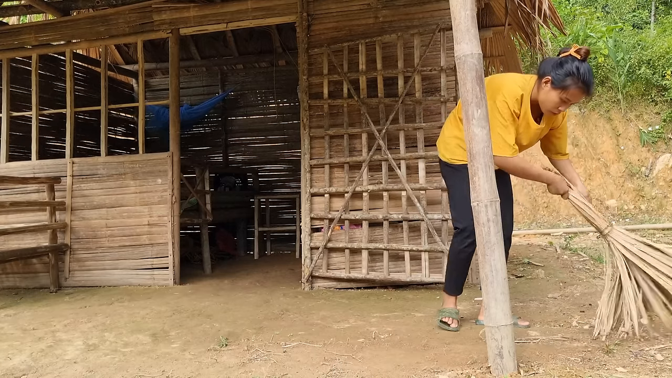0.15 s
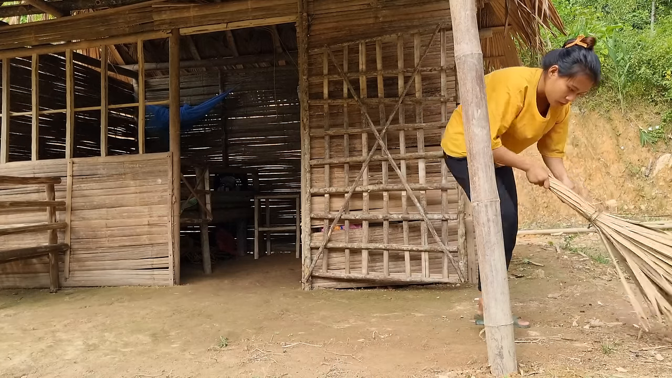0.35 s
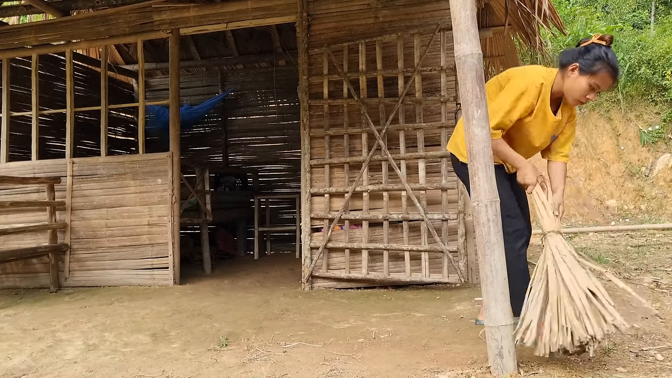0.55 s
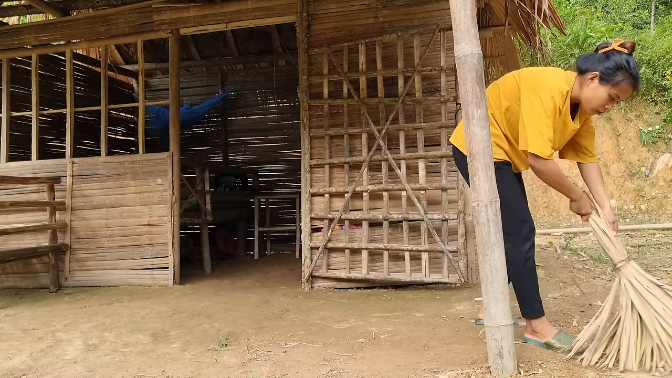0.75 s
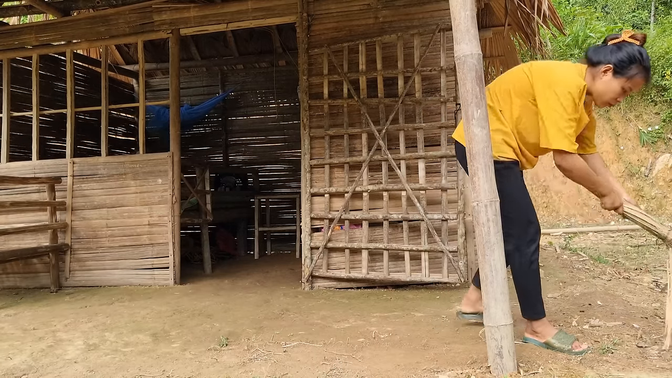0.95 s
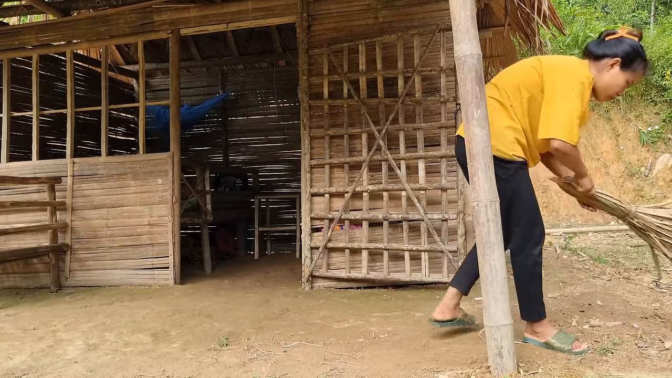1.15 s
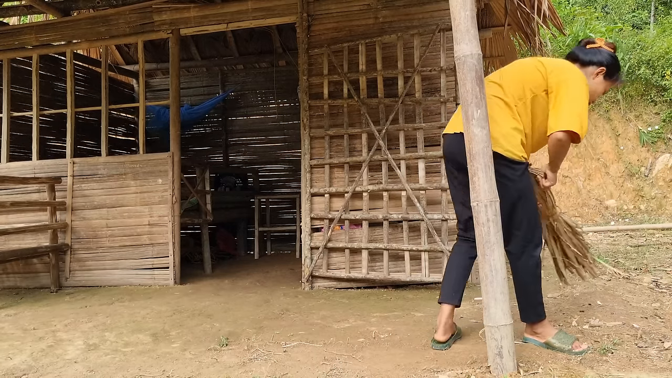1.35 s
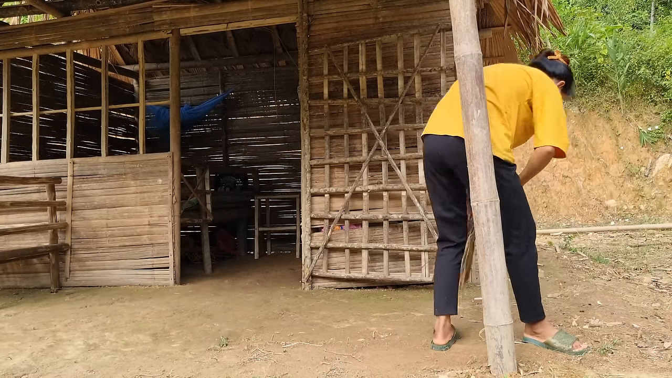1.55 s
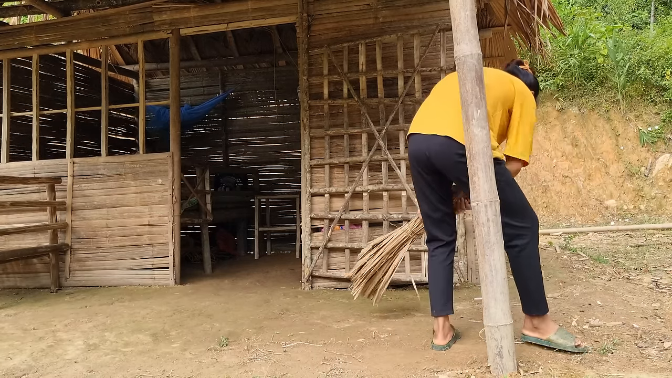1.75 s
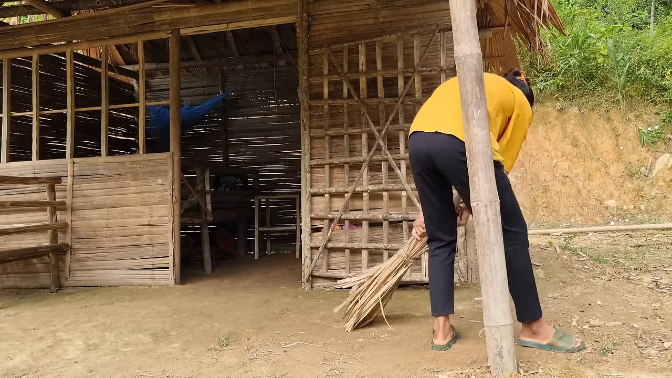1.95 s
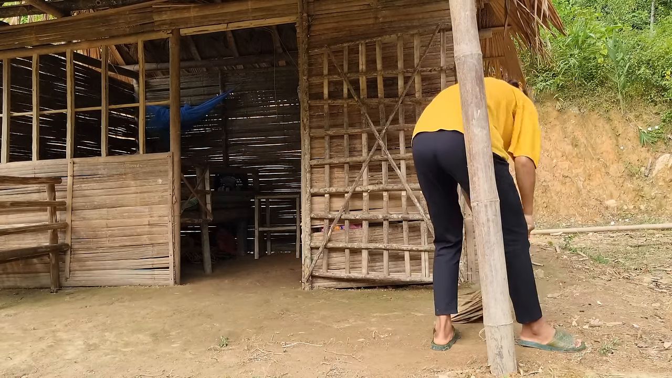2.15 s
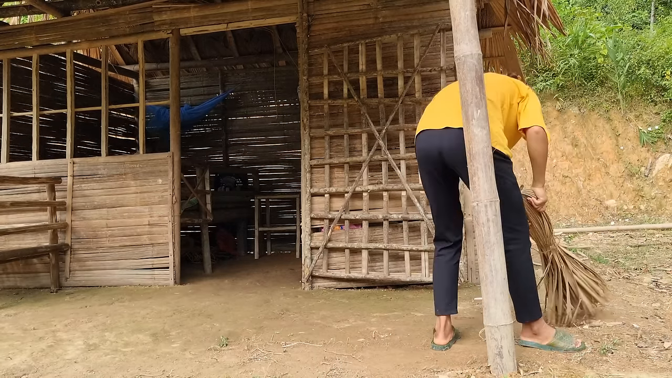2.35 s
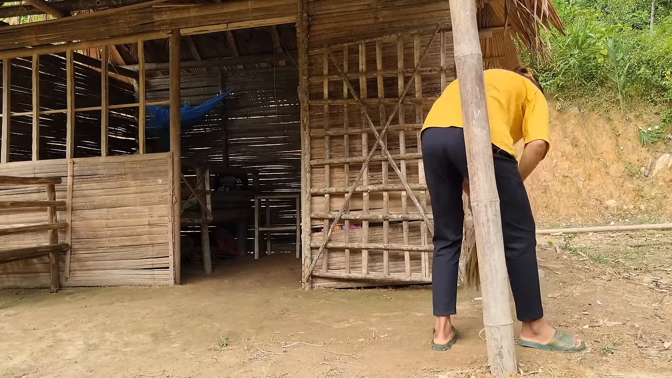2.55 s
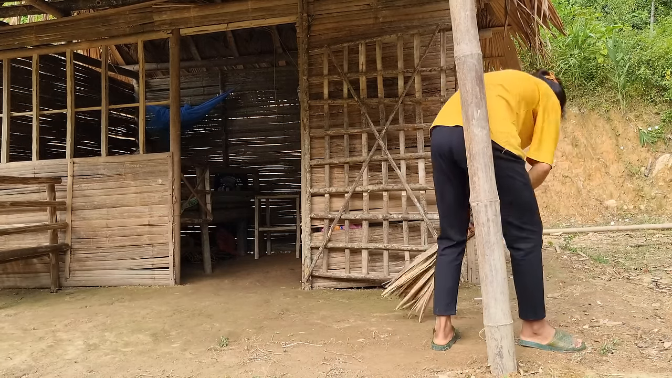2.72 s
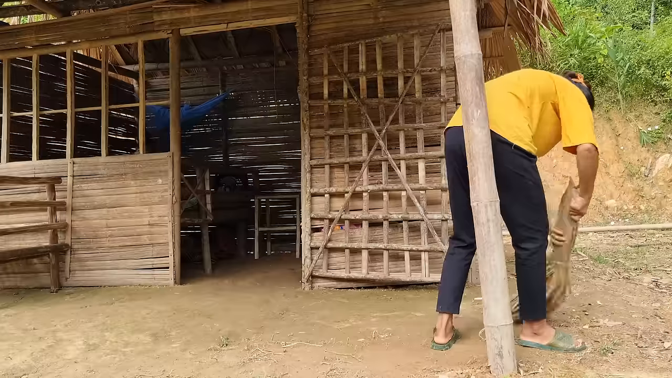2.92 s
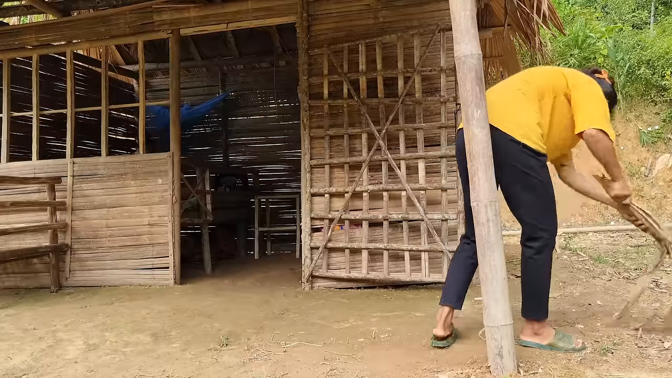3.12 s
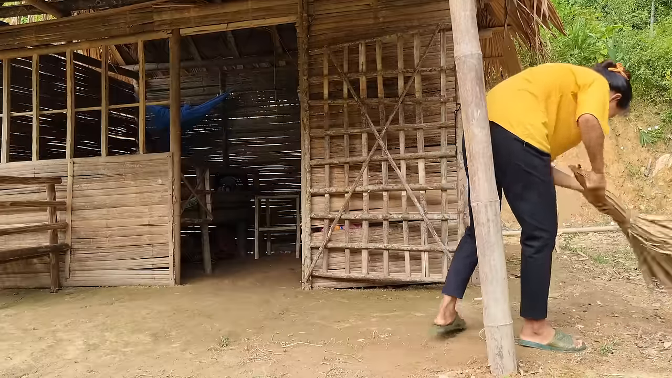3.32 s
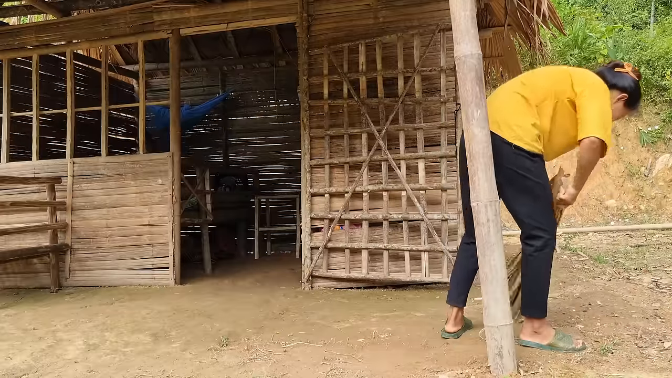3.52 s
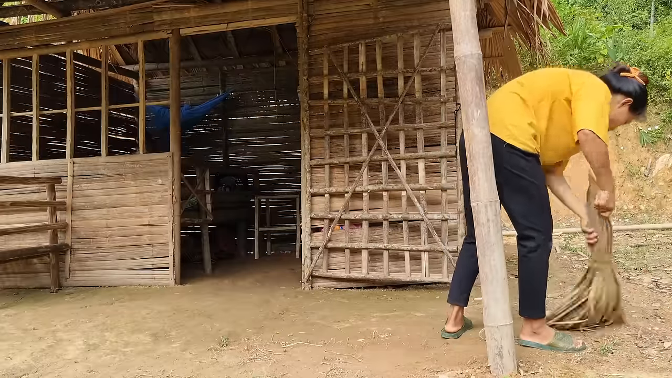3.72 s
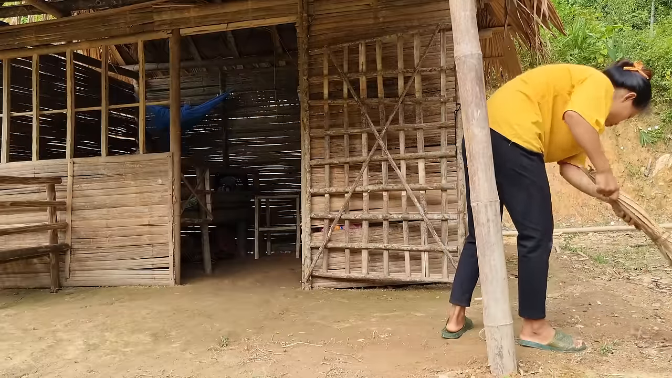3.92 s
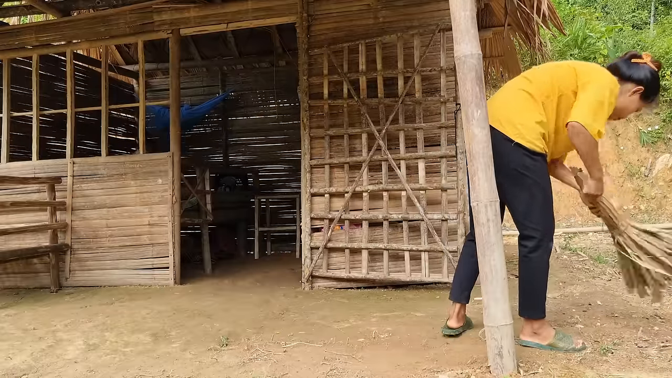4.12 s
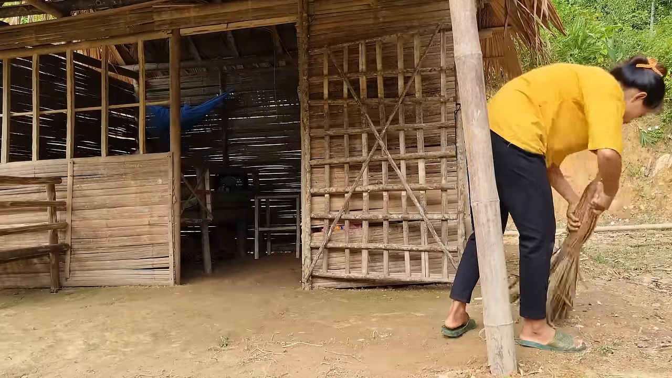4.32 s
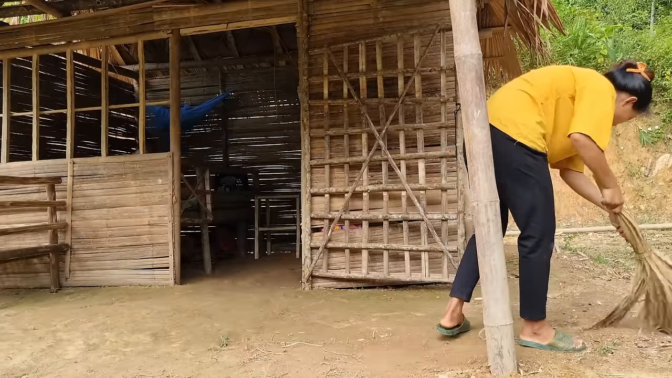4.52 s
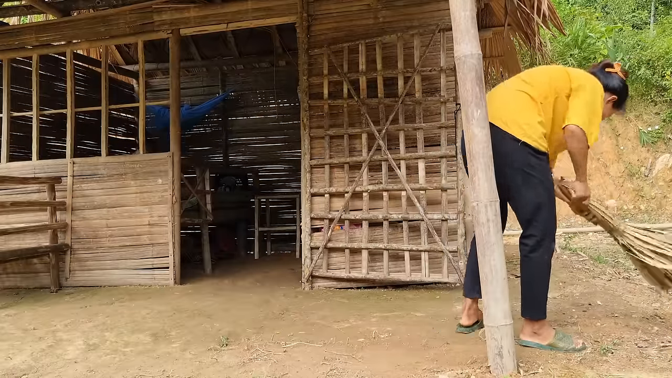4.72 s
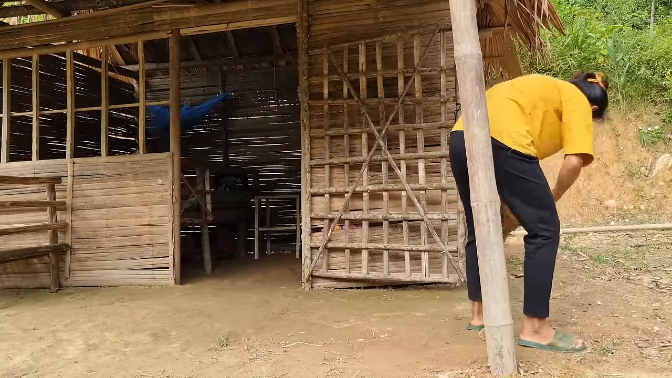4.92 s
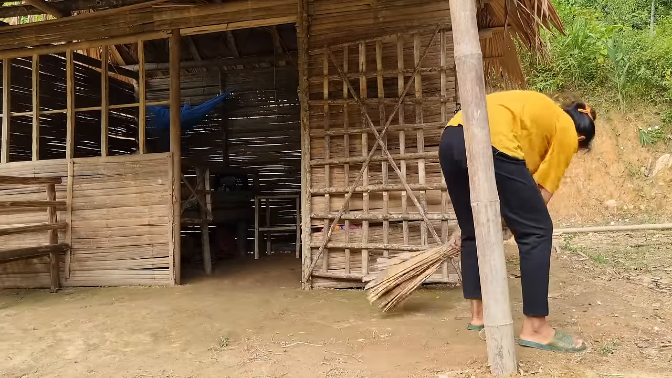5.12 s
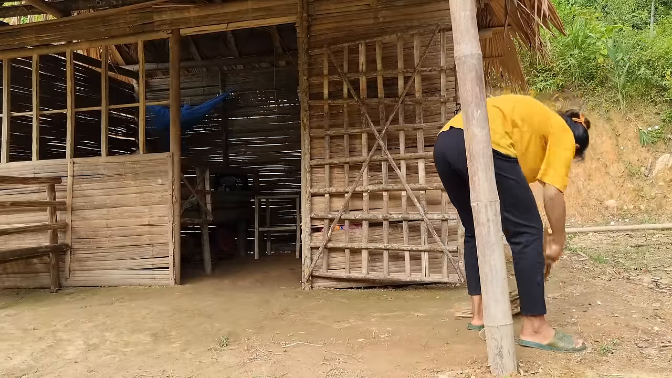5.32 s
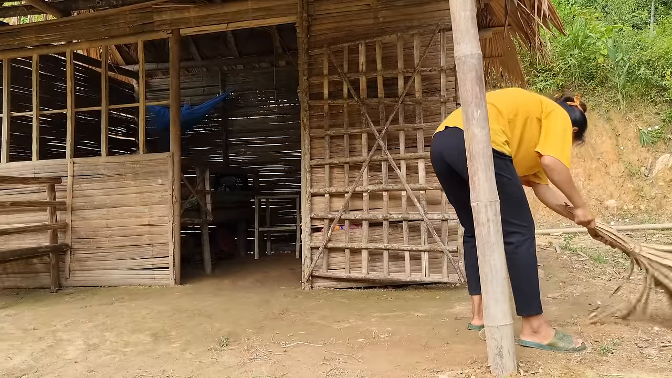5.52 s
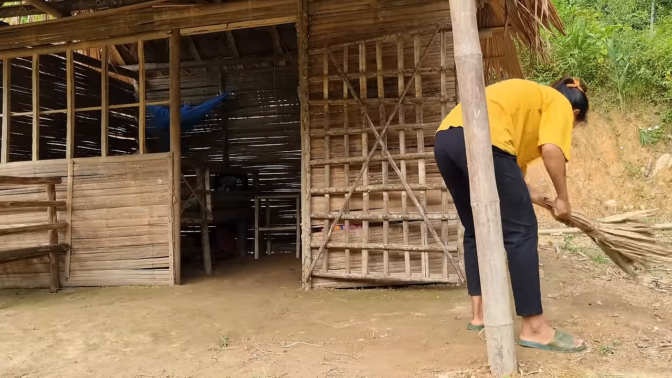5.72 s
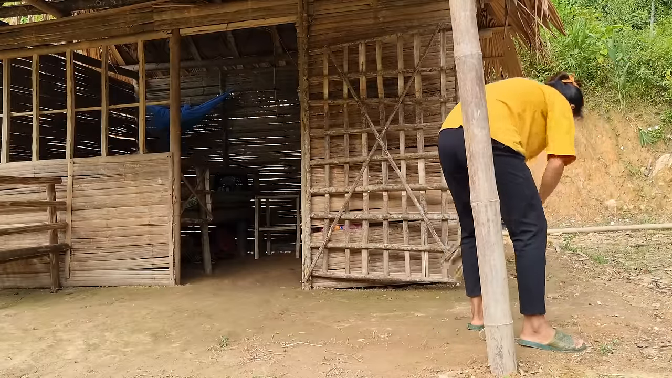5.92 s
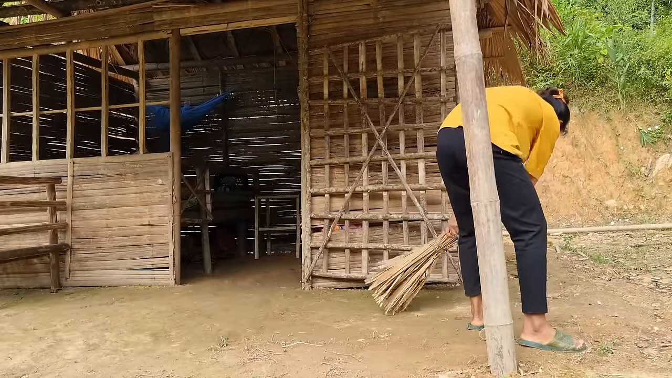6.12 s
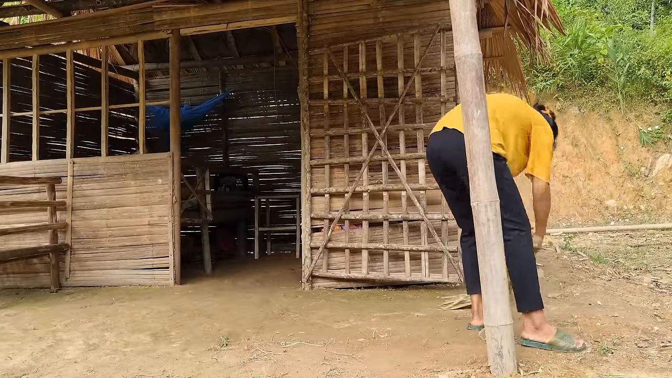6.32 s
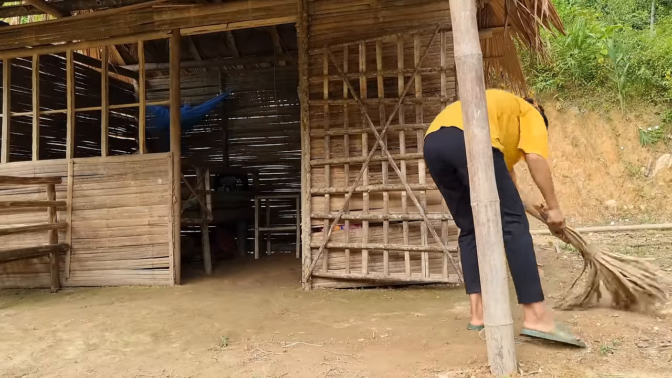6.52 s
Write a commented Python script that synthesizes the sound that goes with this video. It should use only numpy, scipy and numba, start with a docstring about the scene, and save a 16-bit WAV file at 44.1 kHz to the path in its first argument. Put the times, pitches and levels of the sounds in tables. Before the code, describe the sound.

A large straw broom sweeps bare packed dirt just right of a close stereo microphone. Eight crisp, rasping strokes swell and fade, the first two close together, then a longer pause before a steadier rhythm. Straws snap, tufts scuff and fine grit ticks after each lift, with soft ground thuds. Wooden walls return a very short echo; faint yard murmur and thin insect buzz continue beneath.

```python
"""A faint yard murmur with two bands of insects, and at once a straw broom sweeping packed dirt.
The broom is to the right of a camera with two microphone ports: slips and twangs of straw tufts, split in bands.
Straws snap, tufts scuff, the ground thuds, and flung grit ticks after each lift: noise sprays and damped sines.
Walls scatter a short echo; murmur and insects are filtered noise that runs on through the pauses."""
import sys
import numpy as np
from scipy import signal
from scipy.fft import rfft, irfft, next_fast_len
from scipy.io import wavfile
from scipy.ndimage import uniform_filter1d, map_coordinates
from numba import njit

SR = 44100
rng = np.random.default_rng(int(sys.argv[2]) if len(sys.argv) > 2 else 0)


def master(y):
    """Save y as 16-bit WAV."""
    cut = np.clip(np.atleast_2d(y).T, -1, 1)
    pcm = np.round(cut * 32767)  # scale
    wavfile.write(sys.argv[1], SR, pcm.astype(np.int16))


N = 293706  # samples


def undb(db):
    """Amplitude factor of a dB value."""
    return 10 ** (np.asarray(db) / 20)


def level(x, rms_db):
    """Scale to an RMS level, taken over all channels together."""
    return x * undb(rms_db) / np.sqrt(np.mean(x ** 2))


def decay(t_s, t60_s):
    """Exponential decay, 60 dB down after t60_s."""
    return np.exp(-np.log(1000) * t_s / t60_s)


def band(x, lo_hz, hi_hz):
    """Butterworth band-pass."""
    sos = signal.butter(2, [lo_hz, min(hi_hz, .45 * SR)], "band", fs=SR, output="sos")
    return signal.sosfilt(sos, x)


def below(x, edge_hz):
    """Gentle low-pass without phase shift, so that x - below(x) is its exact complement."""
    size = next_fast_len(N)
    hz = np.arange(size // 2 + 1) * SR / size
    return irfft(rfft(x, size) / (1 + (hz / edge_hz) ** 4), size)[..., :N]


def colour(x, table, column):
    """Filter whose gain follows one dB column of a table, interpolated over log frequency."""
    size = next_fast_len(N)
    hz = np.maximum(np.arange(size // 2 + 1) * SR / size, 1)
    rows = np.array(table)
    gain_db = np.interp(np.log(hz), np.log(rows[:, 0]), rows[:, column])
    return irfft(rfft(x, size) * undb(gain_db), size)[:N]


def walk(rate_hz):
    """Random levels held 1 / rate_hz seconds and slewed twice."""
    hold = int(SR / rate_hz)
    steps = np.repeat(rng.standard_normal(N // hold + 1), hold)
    return 1.03 * uniform_filter1d(uniform_filter1d(steps, hold), hold)[:N]


# yard murmur spectrum: freq_hz, left_db, right_db (relative)
YARD_SPECTRUM = [(30, -4, -18), (97, -12, -14), (242, -5, -12.5), (350, 5.5, -0.5), (453, -1, -7.5),
                 (1050, 3, -7), (1400, -11.5, -16), (2660, -4.5, -14.5), (3900, -20, -21), (6440, -35, -24),
                 (7200, -50, -55), (9300, -39, -25), (15500, -21, -50)]
# insect bands: low_hz, high_hz
INSECT_BANDS_HZ = [(4500, 5500), (6400, 7300)]
# insect levels, one row a band: left_db, right_db
INSECT_LEVELS_DB = [(-70, -69), (-78, -72)]
YARD_DB, YARD_OPPOSED = -60.5, 0.98  # RMS before wavering; share of opposed middle range


def yard():
    """Murmur with its middle range in opposite phase at the ports and a wavering low end; insects buzz above."""
    common = band(rng.standard_normal(N), 287, 2500)
    own = rng.standard_normal((2, N))
    opposed = np.array([common, -common])
    noise = own + YARD_OPPOSED * (opposed - band(own, 270, 1880))
    murmur = np.array([colour(noise[k], YARD_SPECTRUM, k + 1) for k in range(2)])
    murmur = level(murmur, YARD_DB)
    low = below(murmur, 410)
    out = low * undb(1.5 * walk(12)) + (murmur - low) * undb(.8 * walk(3))
    for (lo_hz, hi_hz), port_db in zip(INSECT_BANDS_HZ, INSECT_LEVELS_DB):
        buzz = band(rng.standard_normal((2, N)), lo_hz, hi_hz) * undb(2.6 * walk(72))
        out = out + level(buzz, 0) * undb(port_db)[:, None]
    return out


# strokes, the head travelling rightwards: start_s, end_s, left_lag_start_ms, left_lag_end_ms,
# drag_db, hiss_db, grit_db (base levels re scrape: dull drag, straw hiss, fine grit)
STROKES = [(0.033, 0.442, .19, 0.28, -9.5, -0.27, 2), (0.717, 1.107, 0.21, .29, -13, -1.2, -1),
           (2.14, 2.42, 0.037, .22, -14, -0.52, 1), (2.936, 3.296, 0.11, 0.3, -14, -0.79, 1.5),
           (3.716, 4.106, .18, 0.27, -12.5, -0.52, 1.5), (4.473, 4.766, .2, 0.27, -14, 0.56, 3),
           (5.373, 5.632, 0.088, 0.27, -13, 0.35, 1), (6.39, 6.58, 0.085, .23, -14.5, -1, 1.5)]
RETURN_S = .12  # head is back in place this long before it travels


def swing():
    """Left-port lag and colours over time: moved along each stroke, held after the lift, carried back."""
    start_s, end_s, first_ms, last_ms, *colours_db = np.transpose(STROKES)
    t = np.arange(N) / SR

    def path(*corners):
        return np.ravel(corners, order="F")[1:]

    knots_s = path(start_s - 2 * RETURN_S, start_s - RETURN_S, start_s, end_s)
    lag_ms = np.interp(t, knots_s, path(np.roll(last_ms, 1), first_ms, first_ms, last_ms))
    colours_db = [np.interp(t, knots_s, path(np.roll(c, 1), c, c, c)) for c in colours_db]
    return lag_ms, *colours_db


def ports(x, lag_ms):
    """The right port is nearer: the left one hears the same sound a little later."""
    return np.array([map_coordinates(x, [np.arange(N) - lag_ms * SR / 1000], order=3), x])


@njit
def ring(starts, hz, cycles, size, n):
    """Each grain is a damped sine that falls to 1/e in the given number of cycles."""
    out = np.zeros(n + 4096)
    for k in range(len(starts)):
        turn = np.exp(complex(-hz[k] / cycles[k], 2 * np.pi * hz[k]) / SR)
        z = size[k] + 0j
        for i in range(min(4096, int(5 * cycles[k] / hz[k] * SR))):
            out[starts[k] + i] += z.imag
            z *= turn
    return out[:n]


def tuft(slips_per_s, scatter_db, judder_db, twangs_per_s, twang_db, cycles):
    """One tuft of straw: dense slips of uneven size in surges; single straws twang at their own pitch."""
    hits = rng.random(N) < slips_per_s / SR
    slips = hits * rng.standard_normal(N) * undb(scatter_db * rng.exponential(size=N))
    chance = rng.random((N // 20, 4))
    when, pitch, damp, size = chance[:int(min(twangs_per_s * N / SR, N // 20))].T
    hz = 500 * 24 ** pitch
    # higher straws start stronger, so the twangs spread evenly over the spectrum
    sizes = undb(twang_db - 25.0 * size) * hz / 2000
    twangs = ring((when * N).astype(np.int64), hz, cycles * (.5 + damp), sizes, N)
    return (slips + twangs) * undb(judder_db * walk(70))


# scrape, one curve a stroke, touch to rustle after the lift: time_s, level_db
SCRAPE_CURVES = [
    [(0., -63), (.02, -55), (.05, -42.5), (.17, -37.5), (.3, -40), (.345, -45.5), (.42, -49.5),
     (.445, -53.5), (.57, -66)],
    [(.66, -58.5), (.745, -48.5), (.775, -37.5), (.95, -38.5), (1.02, -39.5), (1.11, -43.5), (1.145, -55.5),
     (1.26, -60), (1.47, -76.5)],
    [(1.84, -83), (2.02, -68), (2.05, -57.5), (2.12, -46.5), (2.22, -40), (2.35, -45.5), (2.43, -43.5),
     (2.52, -52.5), (2.62, -60), (2.72, -64)],
    [(2.8, -63), (2.88, -59.5), (2.925, -46), (3.06, -42), (3.085, -37.5), (3.2, -39.5), (3.3, -47),
     (3.33, -51), (3.41, -58), (3.6, -64.5)],
    [(3.65, -54.5), (3.72, -48), (3.77, -45), (3.8, -40.5), (3.86, -35), (4., -38.5), (4.11, -43.5),
     (4.15, -56), (4.22, -60), (4.28, -63.5), (4.4, -68)],
    [(4.47, -45), (4.55, -40.5), (4.64, -38.5), (4.69, -43.5), (4.74, -47.5), (4.8, -50.5), (4.85, -59.5),
     (4.95, -65.5), (5.12, -75.5)],
    [(5.25, -67), (5.29, -54.5), (5.34, -43), (5.43, -40.5), (5.56, -37), (5.65, -41), (5.75, -51.5),
     (5.83, -53), (5.95, -65)],
    [(6.21, -71.5), (6.3, -54), (6.38, -42.5), (6.48, -40), (6.54, -39), (6.66, -39.5)],
]
# broom colour at each port: freq_hz, left_db, right_db (relative)
PORT_COLOURS = [(35, -32.6, -33.1), (100, -19.2, -21.9), (300, -12.3, -14.1), (600, -11.5, -9.4),
                (900, -6.5, -2.5), (1300, -2.0, 0.0), (2000, -2.7, -2.2), (2600, -4.4, -5.8),
                (3200, -4.6, -6.9), (4200, -9.8, -5.2), (6000, -15.7, -9.9), (7800, -28.3, -17.2),
                (10000, -23.2, -13.5), (15300, -17.4, -10.6)]
# edges between drag, scrape, hiss and grit: edge_hz
SPLIT_HZ = (616, 2123, 6240)
TUFT_SPREAD_MS = 0.045
UNSHARED_DB = -5  # gain of the slips drawn apart for each port
FLICKER_DB = 0.44
SIDE_LAG_MS, FULL_DB = .25, -40  # lag and scrape level at which the stroke colours hold
# further right the sweeper hides less of the broom
DRAG_DB_PER_MS, HISS_DB_PER_MS, GRIT_DB_PER_MS = 13., 2.5, 42
# dB per dB of scrape level
DRAG_PER_DB, HISS_PER_DB, GRIT_PER_DB = -0.11, -0.12, 0.07


def broom(lag_ms, drag_db, hiss_db, grit_db, count=5):
    """Tufts lie side by side, each with its own lag; their rub splits into drag, scrape, hiss and grit."""
    scrape_db = np.interp(np.arange(N) / SR, *np.concatenate(SCRAPE_CURVES).T)
    right_ms = lag_ms - SIDE_LAG_MS
    touch_db = np.maximum(scrape_db - FULL_DB, -22)
    drag_db = drag_db + DRAG_DB_PER_MS * right_ms + DRAG_PER_DB * touch_db
    hiss_db = hiss_db + HISS_DB_PER_MS * right_ms + HISS_PER_DB * touch_db + FLICKER_DB * walk(23)
    grit_db = grit_db + GRIT_DB_PER_MS * right_ms + GRIT_PER_DB * touch_db + FLICKER_DB * walk(22)

    places = np.linspace(-1, 1, count)
    rub = sum(ports(tuft(7000, 0.84, 4.0, 350, -8.0, 6.5), lag_ms + TUFT_SPREAD_MS * p) for p in places)
    apart = np.array([tuft(7000, 2.3, 1.74, 350, -4.0, 13.0) for _ in range(2)])
    rub = rub + undb(UNSHARED_DB) * (apart - below(apart, 210))
    rub = rub * undb(1.0 * walk(30))
    rub = np.array([colour(rub[k], PORT_COLOURS, k + 1) for k in range(2)])

    low, mid, top = (below(rub, hz) for hz in SPLIT_HZ)
    drag = level(low, 0) * undb(drag_db + 1.5 * walk(25))
    scrape = level(mid - low, 0) * undb(FLICKER_DB * walk(27))
    hiss = level(top - mid, 0) * undb(hiss_db)
    grit = level(rub - top, 0) * undb(grit_db)
    return (drag + scrape + hiss + grit) * undb(scrape_db)


BURST_PAN_DB = -3.5  # left re right


def bursts(table, lag_ms, rise_s, spread, crack):
    """Short noise sprays: a band round the straw's ring and a treble edge, later at the left port."""
    out, t = np.zeros((2, N + SR)), np.arange(SR // 5) / SR
    for start_s, level_db, ring_hz, treble_db, t60_s in table:
        spray = rng.standard_normal(len(t)) * (1 - np.exp(-t / rise_s)) * decay(t, t60_s)
        spray[2] += crack  # single-sample impulse at the onset
        body = band(spray, ring_hz / spread, ring_hz * spread)
        body = body / np.abs(body).max()
        treble = band(spray, 4540, 20400)
        treble = treble * undb(treble_db) / np.abs(treble).max()
        right = int(start_s * SR)
        left = right + int(np.interp(start_s, np.arange(N) / SR, lag_ms) * SR / 1000)
        # the camera body shades the left port from the treble
        out[0, left:left + len(t)] += (body + undb(-6) * treble) * undb(level_db + BURST_PAN_DB / 2)
        out[1, right:right + len(t)] += (body + treble) * undb(level_db - BURST_PAN_DB / 2)
    return out[:, :N]


SNAP_T60_S, SNAP_RISE_S, SNAP_SPREAD = 0.026, .0001, 1.44
SNAP_CRACK = 7.0  # the stalk breaks in one instant; re spray


def snap_bursts(rows, lag_ms):
    """Quick sprays that open with a crack."""
    rows = [(*row, SNAP_T60_S) for row in rows]
    return bursts(rows, lag_ms, SNAP_RISE_S, SNAP_SPREAD, SNAP_CRACK)


# straws snap and pebbles tick: start_s, level_db (body peak before pan), ring_hz, treble_db (re body peak)
SNAPS = [(0.0267, -53, 1900, -6), (0.3573, -30, 4120, 5), (0.4105, -22, 2950, -6),
         (0.5325, -37.5, 2740, 2.5), (0.6745, -37, 4200, 1), (.695, -30, 5150, -5), (0.737, -36, 3730, -10),
         (0.763, -23.5, 3460, 4), (1.0574, -39, 3410, 10), (1.2242, -30, 3680, -1), (1.3105, -50, 4660, 8),
         (1.962, -46, 2650, 0), (2.0373, -43, 1840, -9), (2.4784, -29, 4100, 4), (2.585, -33, 1790, -8),
         (2.666, -40, 2500, 1), (2.897, -40.5, 1550, 11), (3.4537, -31.5, 3180, -17),
         (3.5454, -45, 3260, 4), (3.6415, -34, 3980, 1), (3.7158, -31, 1670, 3), (3.7793, -41, 4410, 15),
         (4.1752, -26.5, 3360, -0.5), (4.2066, -34.5, 4140, 2), (4.2614, -58, 3900, 17),
         (4.3572, -37.5, 4030, -5), (4.9124, -33.5, 2040, 0), (4.918, -30, 4300, -3),
         (4.9576, -43, 3700, 9), (5.0495, -45, 1980, -14), (5.284, -36.5, 1980, -18),
         (5.8315, -32, 3900, -6), (5.8458, -30.5, 3870, 0), (5.877, -56, 3810, 0), (6.0122, -41, 3700, -13),
         (6.0177, -42.5, 2400, 2)]


def snaps(lag_ms):
    """Single straws break and pebbles click at set moments."""
    return snap_bursts(SNAPS, lag_ms)


# tufts catch and scuff: start_s, level_db (body peak before pan), centre_hz, treble_db (re body peak), t60_s
SCUFFS = [(.0413, -37.5, 4000, -15, 0.41), (.3185, -20.5, 3580, 0.5, 0.068), (.385, -29, 3920, 2.5, 0.033),
          (.4131, -23.5, 3000, -3.5, 0.052), (1.0306, -25, 3770, 1, .081), (1.0944, -27, 3080, -5, 0.074),
          (1.1742, -35, 2790, -2, 0.024), (1.201, -36, 3500, -2.5, 0.091), (1.3455, -49, 3730, 1, 0.036),
          (3.0772, -29, 3680, 2, 0.29), (3.3088, -37, 3620, -7, 0.072), (3.378, -31.5, 3450, -1, 0.081),
          (4.0923, -25.5, 3500, -12, 0.034), (4.3164, -40, 3970, -1.5, 0.14), (4.411, -40, 3720, -3, 0.06),
          (4.7956, -32.5, 3740, 2.5, .12), (5.7768, -26.5, 3020, -1, 0.045)]


def scuffs(lag_ms):
    """A tuft catches and scuffs for a moment: a softer onset and a wider band than a snap."""
    return bursts(SCUFFS, lag_ms, rise_s=.0012, spread=1.68, crack=0.42)


# thuds of broom head and sandals: start_s, level_db (peak before pan), pitch_hz, t60_s
BUMPS = [(0.05, -64, 262, .08), (1.099, -55, 113, 0.091), (3.061, -53, 158, 0.16), (3.791, -56.5, 99, 0.17),
         (4.019, -47.5, 106, 0.16), (4.615, -55.5, 178, 0.09), (5.205, -54.5, 363, .15),
         (5.69, -54.5, 94, 0.11), (5.847, -59, 338, 0.11), (6.523, -48, 182, 0.097)]


def bumps():
    """Soft, short thuds of the ground: damped sines with a rounded onset."""
    out, t = np.zeros(N + SR), np.arange(SR // 3) / SR
    for start_s, level_db, pitch_hz, t60_s in BUMPS:
        thud = np.sin(2 * np.pi * pitch_hz * t) * (1 - np.exp(-t / 0.0044)) * decay(t, t60_s)
        i = int(start_s * SR)
        out[i:i + len(t)] += undb(level_db) * thud / np.abs(thud).max()
    return out[:N] * undb([[1.5], [-1.5]])


TICK_DB, TICK_SCATTER_DB, TICK_HZ, TICKS_LAST_S = -53, 1.5, 3280, 0.29  # scatter only adds to TICK_DB


def ticks(lag_ms, count=4):
    """Flung grit drops after each lift at chance moments, sprayed like the snaps."""
    when, size, pitch = rng.random((count * len(STROKES), 3)).T
    lifts_s = np.repeat(np.transpose(STROKES)[1], count)
    start_s = np.minimum(lifts_s + TICKS_LAST_S * when, N / SR)
    level_db = TICK_DB - TICK_SCATTER_DB * np.log(1 - size)
    ring_hz = TICK_HZ * 2 ** (pitch - .5)
    treble_db = np.full(len(when), -3.)
    return snap_bursts(list(zip(start_s, level_db, ring_hz, treble_db)), lag_ms)


# waves bend round the camera body: freq_hz, left_lag_rad
BEND = [(100, .33), (300, .074), (500, 1), (800, .66), (1200, .51), (1700, .41), (2200, .091),
        (3000, -.059), (4500, .73)]


def bend(x):
    """Phase lag by frequency, no change of gain."""
    size = next_fast_len(N)
    hz = np.arange(size // 2 + 1) * SR / size
    lag_rad = np.interp(hz, *np.transpose(BEND))
    return irfft(rfft(x, size) * np.exp(-1j * lag_rad), size)[:N]


HUT_DB, HUT_T60_S = -12, .12


def hut(x):
    """Wooden walls and the bank behind scatter a short, different echo to each port."""
    t = np.arange(SR // 4) / SR
    echo = rng.standard_normal((2, len(t))) * decay(t, HUT_T60_S)
    echo *= undb(HUT_DB) / np.sqrt(np.sum(echo ** 2, axis=1, keepdims=True))
    return signal.fftconvolve(band(x, 310, 9200)[None], echo, axes=1)[:, :N]


def scene():
    """Broom and its bursts, bent at the left port; thuds, echo and yard added."""
    lag_ms, *colours_db = swing()
    near = broom(lag_ms, *colours_db) + snaps(lag_ms) + scuffs(lag_ms) + ticks(lag_ms)
    near = np.array([bend(near[0]), near[1]]) + bumps()
    return near + hut(near.mean(axis=0)) + yard()


TOP_HZ = 15450


def record(dry):
    """The microphones roll off the deep bass; the recorder cuts the top steeply."""
    dry = signal.sosfilt(signal.butter(1, 60, "high", fs=SR, output="sos"), dry)
    return signal.sosfilt(signal.ellip(12, .3, 70, TOP_HZ, fs=SR, output="sos"), dry)


dry = scene()
out = record(dry)
master(out)
```